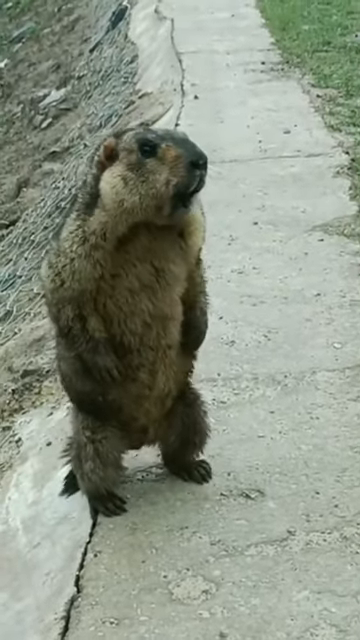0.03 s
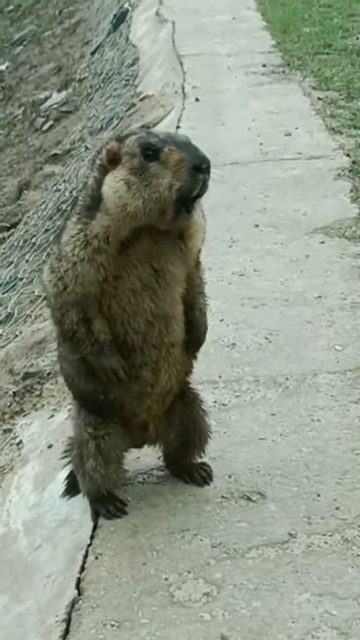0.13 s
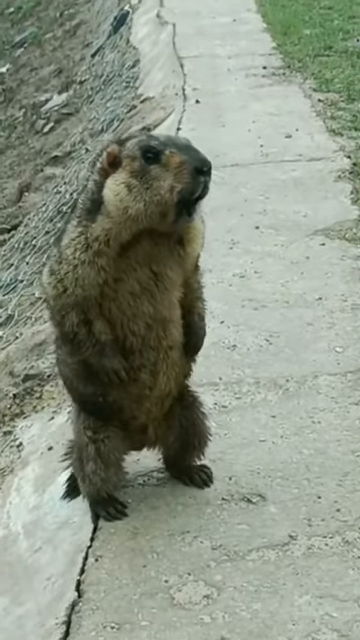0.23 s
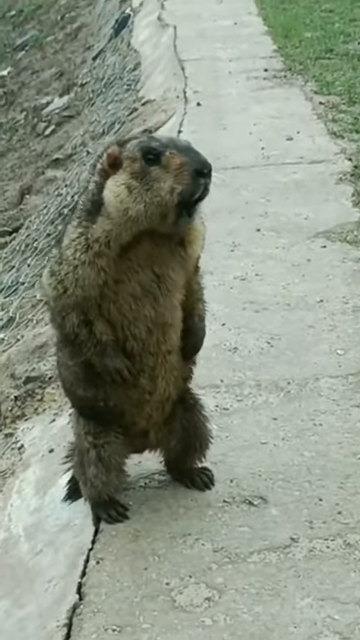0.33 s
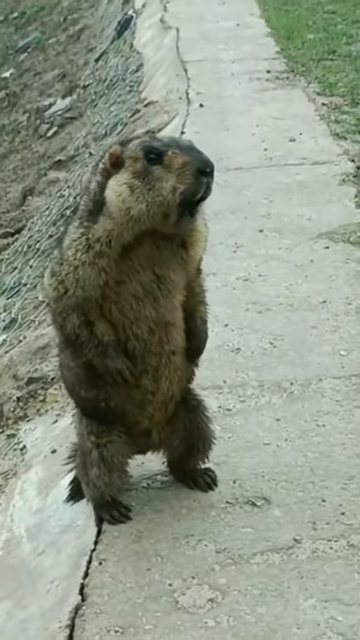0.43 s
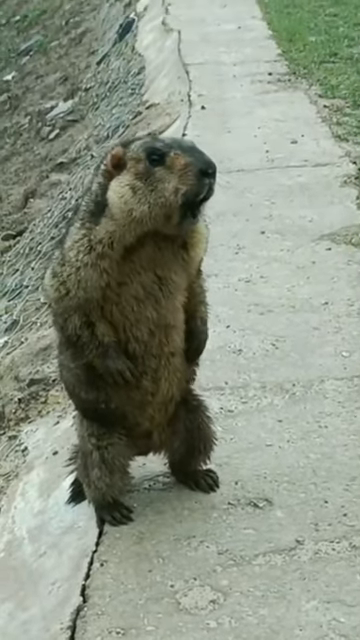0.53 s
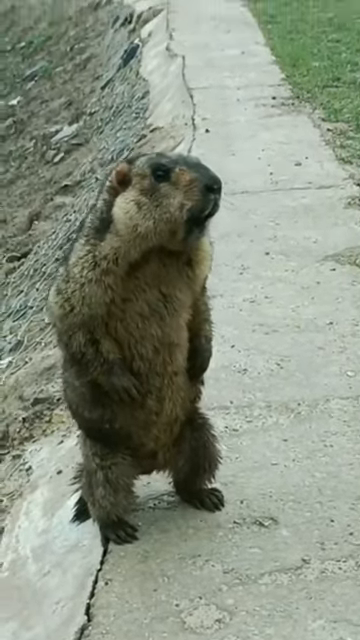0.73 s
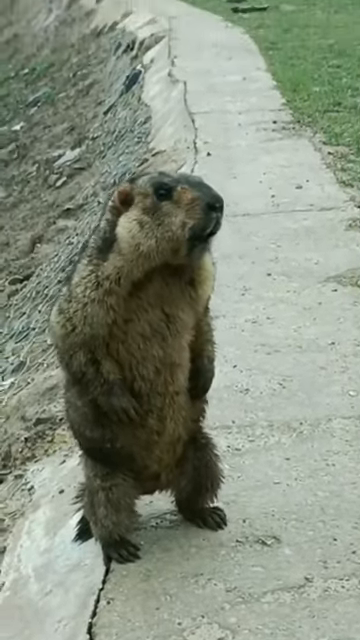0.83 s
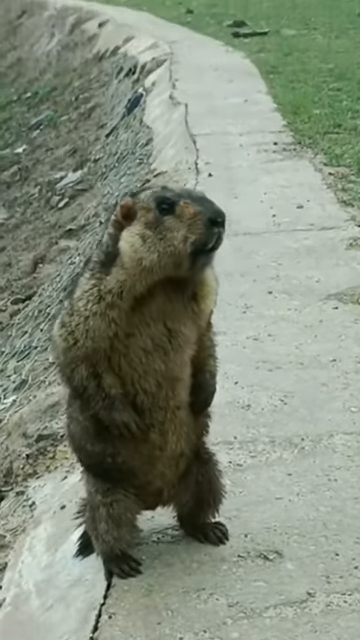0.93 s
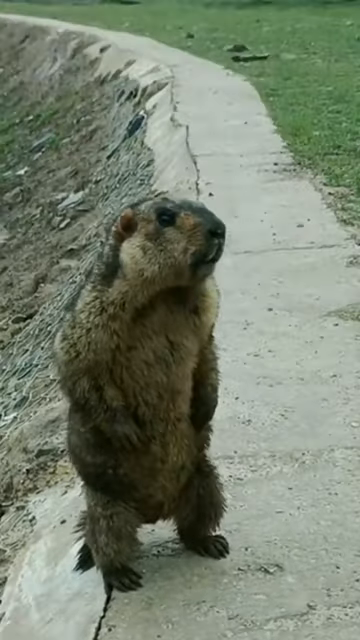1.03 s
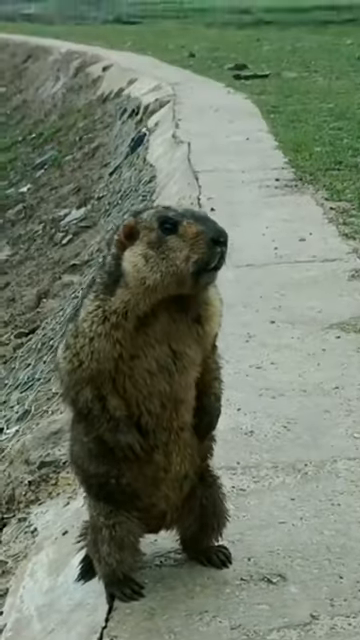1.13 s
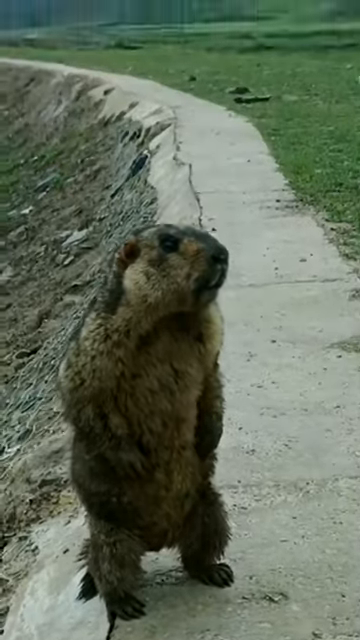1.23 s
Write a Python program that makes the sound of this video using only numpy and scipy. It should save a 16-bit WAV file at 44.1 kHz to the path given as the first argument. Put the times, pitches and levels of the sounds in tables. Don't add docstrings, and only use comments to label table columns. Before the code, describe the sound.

A marmot gives four sharp, rising alarm whistles, close and loud in the open. Quiet wind rushes throughout. A burst of throaty breath at 0.2 s leads into the first upward sweep, with a second at 0.32 s, a third at 0.55 s and the quickest, loudest at 0.7 s. Tiny squeaks edge the calls. After 0.8 s wind softly buffets the microphone, and grit ticks around 1.08 s.

```python
import sys
import numpy as np
from scipy import signal
from scipy.fft import rfft, irfft, next_fast_len
from scipy.io import wavfile
from scipy.ndimage import uniform_filter1d, map_coordinates

SR = 44100
rng = np.random.default_rng(int(sys.argv[2]) if len(sys.argv) > 2 else 0)


def boost(x):
    u = np.asarray(x, float) / 20
    return 10 ** u


def digitize_waveform(pressure):
    field = np.atleast_2d(pressure).T
    bounded = np.clip(field, -1, 1)
    quanta = np.round(bounded * 32767).astype(np.int16)
    wavfile.write(sys.argv[1], SR, quanta)


N = 57330
T_S = np.arange(N) / SR


def unit(x):
    return x / np.sqrt(np.mean(x ** 2) + 1e-20)


def along(points, hz):
    f, v = np.transpose(points)
    return np.interp(np.log(hz + 1), np.log(f + 1), v)


def wobble(rate_hz):
    knots = rng.standard_normal(int(N * rate_hz / SR) + 4)
    return map_coordinates(knots, [np.arange(N) * rate_hz / SR])


def filtered(x, response):
    m = next_fast_len(N + SR // 2)
    return irfft(rfft(x, m) * response(np.fft.rfftfreq(m, 1 / SR)), m)[..., :N]


def gate(start_s, end_s, attack_s, release_s):
    rise = (T_S - start_s) / attack_s
    fall = 1 - (T_S - end_s) / release_s
    return np.sin(np.pi / 2 * np.clip(np.minimum(rise, fall), 0, 1)) ** 2


def patchy(x, patchy_db, size, hz_bins, frames):
    z = signal.stft(x, nperseg=size)[2]
    field = rng.standard_normal(z.shape[-2:])
    field = uniform_filter1d(uniform_filter1d(field, hz_bins, axis=0), frames, axis=1)
    return signal.istft(z * boost(patchy_db * unit(field)), nperseg=size)[1][..., :N]


def pair(spectrum, alike, patchy_db):
    two = patchy(rng.standard_normal((2, N)), patchy_db, 512, 5, 6)

    def mid_side(hz):
        turn = np.arccos(np.clip(along(alike, hz), -1, 1)) / 2
        return boost(along(spectrum, hz)) * [np.cos(turn), np.sin(turn)]

    mid, side = filtered(two, mid_side)
    return unit(np.array([mid + side, mid - side]))


# (time [s], level [dB])
WIND_STRENGTH = [(0.0, -42), (0.122, -40.5), (0.26, -42), (0.404, -44.5), (0.958, -41), (1.096, -40),
                 (1.3, -40)]
# (frequency [Hz], density [dB per Hz])
RUSH_SPECTRUM = [(88, -50), (150, -14), (390, -5.5), (749, -5.5), (1540, -8.5), (2300, -10.5), (3620, -19),
                 (4980, -23.5), (8230, -39.5), (10700, -71), (18100, -120)]
# (frequency [Hz], density [dB per Hz])
RUMBLE_SPECTRUM = [(12, -31), (20, -16.5), (49, -5.5), (200, -14), (260, -19.5), (440, -120)]
# (frequency [Hz], left-right likeness [-1..1])
RUSH_LIKENESS = [(60, 0.07), (120, -0.87), (240, 1), (480, 0.67), (970, 0.36), (1940, 0.063), (3880, -0.16),
                 (7780, 0.076)]
# (frequency [Hz], left over right [dB])
WIND_LEAN = [(60, -0.5), (160, 0.5), (420, -1), (1110, 2), (2940, -5.5), (7780, 8)]
# (time [s], length [s], level over the lull [dB])
BUFFETS = [(0.208, 0.047, 16.5), (0.282, .05, 6.5), (0.345, 0.075, 12), (0.54, 0.043, 13.5),
           (0.591, 0.033, 8), (0.684, 0.045, 6), (0.731, 0.032, 7), (0.874, 0.051, 12.5),
           (0.925, .06, 15.5), (1.013, 0.091, 13), (1.094, 0.035, 11)]
RUSH_DB, RUMBLE_DB = 2.5, -22.5


def wind():
    time_s, db = np.transpose(WIND_STRENGTH)
    strength_db = np.interp(T_S, time_s, db)
    rush_db = RUSH_DB + 1.8 * wobble(11.18) + 1.27 * wobble(120)
    rush = boost(rush_db) * pair(RUSH_SPECTRUM, RUSH_LIKENESS, patchy_db=3.0)
    lumps_db = sum(db * gate(s - d, s, d, d) for s, d, db in BUFFETS)
    lumps_db = lumps_db + 2.5 * np.array([wobble(22), wobble(9.9)])
    rumble = boost(RUMBLE_DB + lumps_db) * pair(RUMBLE_SPECTRUM, [(30, .1), (150, 1.0)], patchy_db=0.5)
    return filtered(boost(strength_db) * (rush + rumble),
                    lambda hz: boost(np.outer([.5, -.5], along(WIND_LEAN, hz))))


# (time [s], level [dB], ring [Hz], T60 [s])
GRIT_TICKS = [
    (1.0745, -25.5, 2070, 0.011),
    (1.084, -27, 780, 0.0075),
    (1.087, -35, 4900, 0.016),
    (1.087, -44, 7000, 0.014),
    (1.107, -41.5, 4800, 0.025),
    (.5, -53, 7000, 0.0057),
]


def ticks():
    out = np.zeros(N)
    for s, db, hz, t60_s in GRIT_TICKS:
        decay = boost(db - 60 * np.abs(T_S - s) / t60_s) * (T_S > s)
        out += decay * np.sin(2 * np.pi * hz * (T_S - s))
    return out


BANK_DB, BANK_T60_S, BANK_WAIT_S = -23, 0.15, 0.0035


def bank(x):
    t = np.arange(SR // 2) / SR
    tail = rng.standard_normal((2, len(t))) * boost(-60 * t / BANK_T60_S) * (t > BANK_WAIT_S)
    return boost(BANK_DB) * signal.fftconvolve(x[None], tail / np.linalg.norm(tail[0]), axes=1)[:, :N]


# (frequency [Hz], width [Hz], depth [dB])
DIPS_LEFT = [(1130, 410, 0.5), (1855, 410, -21), (2794, 370, -10), (3330, 202, -19), (4310, 610, -16.5)]
# (frequency [Hz], width [Hz], depth [dB])
DIPS_RIGHT = [(1493, 185, -32), (2413, 308, -21.5), (3750, 240, -8), (4260, 350, -7.5), (7000, 1200, -12.5),
              (7900, 2000, -11.5)]
# (frequency [Hz], left lead [rad])
LEFT_LEAD = [(1100, 0.41), (2200, 11.23), (2900, 4.32), (3260, 4.76), (3450, 9.3), (3750, 11.74),
             (5500, 11.7), (6800, 11.06)]


def ports(x):
    def dips(rows, hz):
        return boost(sum(db * np.exp(-(2 * (hz - c) / w) ** 2) for c, w, db in rows))

    def response(hz):
        half_lead = .5j * along(LEFT_LEAD, hz)
        return [dips(DIPS_LEFT, hz) * np.exp(half_lead), dips(DIPS_RIGHT, hz) * np.exp(-half_lead)]

    return filtered(x, response)


# (frequency [Hz], width [Hz], level [dB])
THROAT_MODES = [(784, 164, -6.5), (1240, 450, -6), (2056, 350, 3), (3538, 480, 4.5), (4803, 345, -1.5),
                (5450, 295, -2.5), (6445, 456, 0), (7960, 930, -7.5)]


def throat(x):
    def ring(f):
        total = 0
        for k, (c, w, db) in enumerate(THROAT_MODES):
            total = total + (-1) ** k * boost(db) * 1j * f * w / (c * c - f * f + 1j * f * w)
        return total ** 2

    return unit(filtered(patchy(x, 5, 256, 3, 4), ring))


# (time [s], length [s], level [dB])
CHEST_GRUNTS = [
    (0.226, 0.056, -34),
    (.55, 0.039, -34),
    (0.707, 0.029, -38),
]
CHEST_HZ = 270


def grunts():
    turn = 2 * np.pi * np.cumsum(CHEST_HZ * (1 + 0.0613 * wobble(60))) / SR
    level = sum(boost(db) * gate(s - d / 2, s, d / 2, d / 2) for s, d, db in CHEST_GRUNTS)
    return (np.sin(turn) + np.sin(3 * turn)) * level


# (time [s], length [s], pitch [Hz], level [dB], overtone [dB])
CLOSING_SQUEAKS = [
    (.208, .012, 1250, -28, -25),
    (.405, .012, 1620, -28, -14),
    (.626, .012, 1600, -30, -8),
    (.645, .025, 560, -36, -8),
    (.691, .018, 1340, -25, -25),
    (.77, .012, 1800, -31, 5),
]
SQUEAK_SAG = .1


def squeaks():
    out = np.zeros(N)
    for s, d, hz, db, over_db in CLOSING_SQUEAKS:
        sag = 1 - SQUEAK_SAG * np.clip((T_S - s) / d, -1, 1) / 2
        turn = 2 * np.pi * hz * (T_S - s) * sag
        tone = np.sin(turn) + boost(over_db) * np.sin(2 * turn) + boost(-21.5) * np.sin(3 * turn)
        out += boost(db) * gate(s - d / 2, s, d / 2, d / 2) * tone
    return out


# (start [s], length [s], burst [dB], held [dB])
AIR_PUFFS = [
    (0.2024, 0.07, -18.5, -28),
    (0.294, 0.015, -27, -33.5),
    (.3155, 0.017, -23.5, -24),
    (0.529, 0.027, -35, -33.5),
    (0.684, 0.011, -37, -31),
]
BURST_T60_S, PUFF_ATTACK_S, PUFF_RELEASE_S = .03, .002, .012


def puffs():
    level = np.zeros(N)
    for s, d, burst_db, held_db in AIR_PUFFS:
        burst = boost(burst_db - 60 * np.abs(T_S - s) / BURST_T60_S)
        level += (boost(held_db) + burst) * gate(s, s + d, PUFF_ATTACK_S, PUFF_RELEASE_S)
    return throat(rng.standard_normal(N) * boost(3.2 * wobble(250))) * level


# (time [s], pitch [Hz], effort [dB])
CALLS = [
    [(.22, 1100, -28), (.23, 1110, -17), (.237, 1500, -10), (.246, 2450, -8), (.255, 3210, -7),
     (.263, 3450, -7), (.268, 3540, -7), (.271, 3760, -7), (.279, 3720, -14)],
    [(.316, 1600, -26), (.32, 1520, -12), (.327, 1380, -9), (.334, 1500, -10), (.342, 2200, -8),
     (.351, 2950, -6), (.359, 3270, -7), (.368, 3400, -5.5), (.378, 3385, -11)],
    [(.547, 1050, -32), (.555, 1110, -22), (.561, 1400, -15), (.569, 2070, -11), (.576, 2830, -9),
     (.582, 3190, -7), (.59, 3340, -5.5), (.596, 3320, -8), (.6, 3240, -18)],
    [(.697, 950, -32), (.705, 1090, -18), (.711, 1320, -11), (.719, 2050, -10), (.726, 2770, -9),
     (.732, 3130, -6), (.736, 3220, -4.5), (.743, 3230, -9), (.748, 3120, -22)],
]
# (frequency [Hz], level under the whistle [dB])
OVERTONE = [(2000, -28.5), (2900, -11.5), (3700, -7), (4500, -18), (5500, -20), (6400, -21), (7000, -21.5),
            (7700, -42.5)]
FADE_S, JITTER = .004, .004
HIGHER_DB = -10
FLUTTER_DB, RASP_DB = .5, 3
AIR_DB, AIR_CLEARS_HZ, AIR_CLEARS_DB = -12.5, 3146, -8.5


def whistles():
    out = np.zeros(N)
    air = throat(rng.standard_normal(N) * boost(2.1 * wobble(200)))
    for rows in CALLS:
        time_s, hz, db = np.transpose(rows)
        pitch_hz = uniform_filter1d(np.interp(T_S, time_s, hz), size=130) * (1 + JITTER * wobble(400))
        turn = 2 * np.pi * np.cumsum(pitch_hz) / SR
        tone = np.sin(turn)
        for k in range(2, 5):
            over_db = along(OVERTONE, k * pitch_hz) + HIGHER_DB * (k - 2.5) + 2.0 * wobble(500)
            tone += boost(over_db) * np.sin(k * turn)
        height = pitch_hz / AIR_CLEARS_HZ
        leak = boost(AIR_DB + AIR_CLEARS_DB * height ** 4) * air
        flutter_db = (FLUTTER_DB + RASP_DB * np.clip(1 - height ** 2, 0, 1)) * wobble(600)
        effort = np.sqrt(2) * boost(np.interp(T_S, time_s, db))
        out += effort * gate(time_s[0], time_s[-1], FADE_S, FADE_S) * (boost(flutter_db) * tone + leak)
    return out


def scene():
    animal = grunts() + squeaks() + puffs() + whistles()
    return wind() + ticks() + bank(animal) + ports(animal)


def low_pass(x):
    return signal.sosfilt(signal.butter(12, 8380, fs=SR, output="sos"), x)


CEILING, KNEE = .97, 6


def record(dry):
    mix = dry / (1 + np.abs(dry / CEILING) ** KNEE) ** (1 / KNEE)
    return low_pass(mix)


dry = scene()
out = record(dry)
digitize_waveform(out)
```